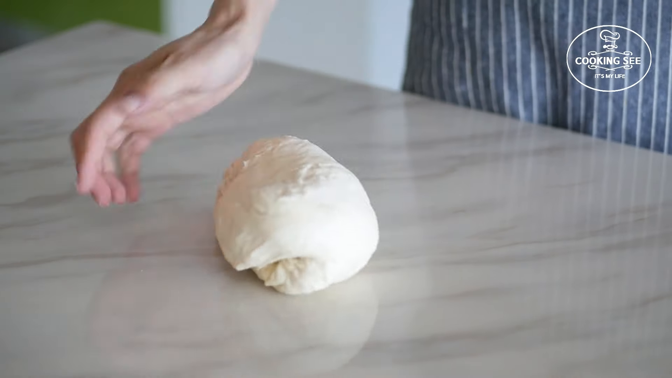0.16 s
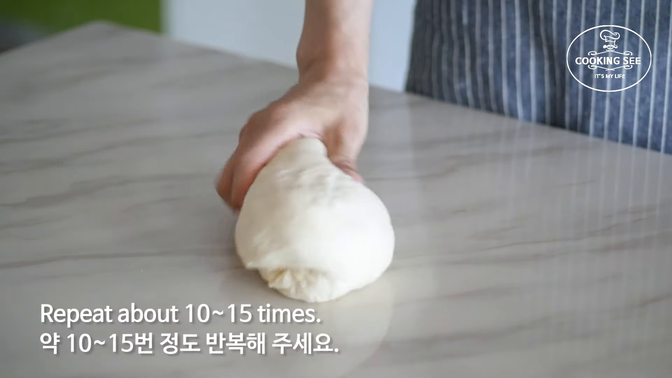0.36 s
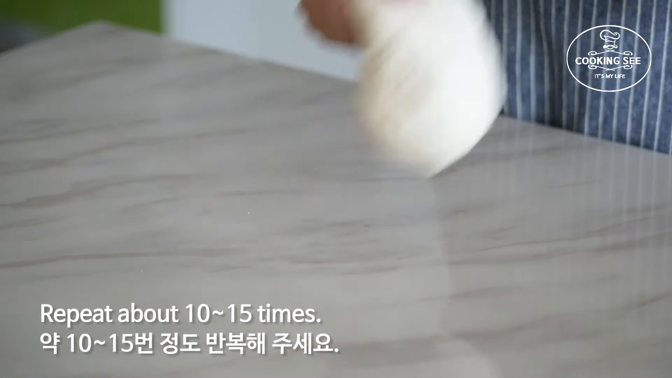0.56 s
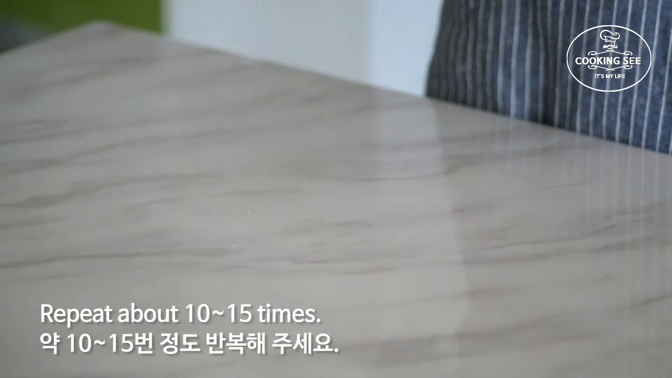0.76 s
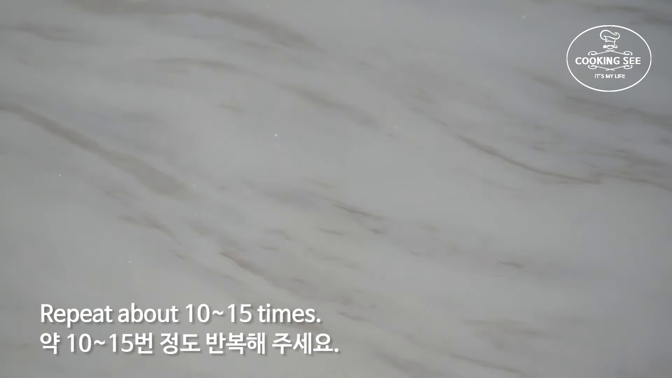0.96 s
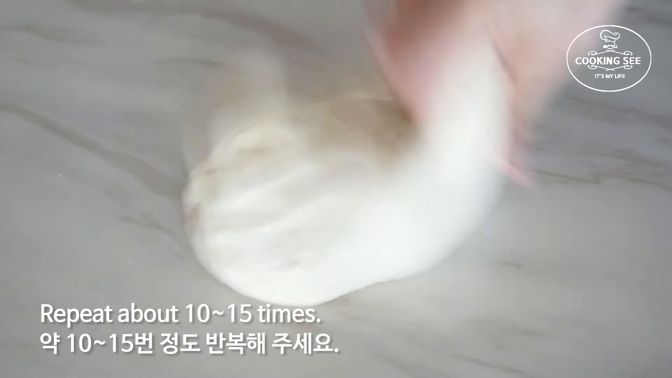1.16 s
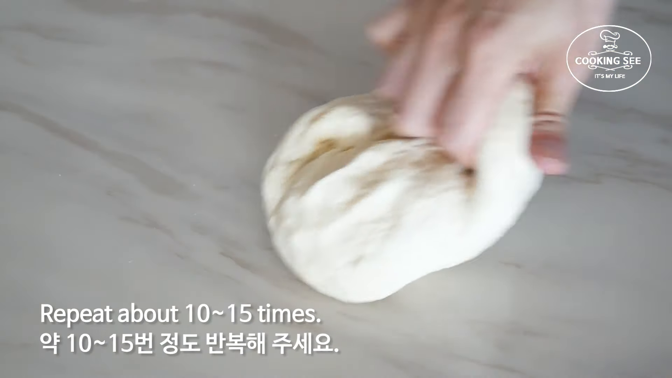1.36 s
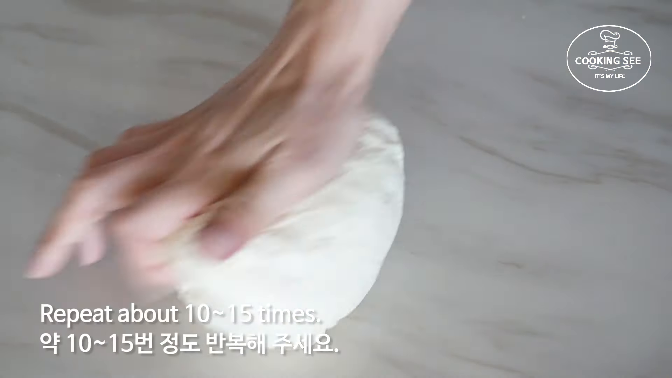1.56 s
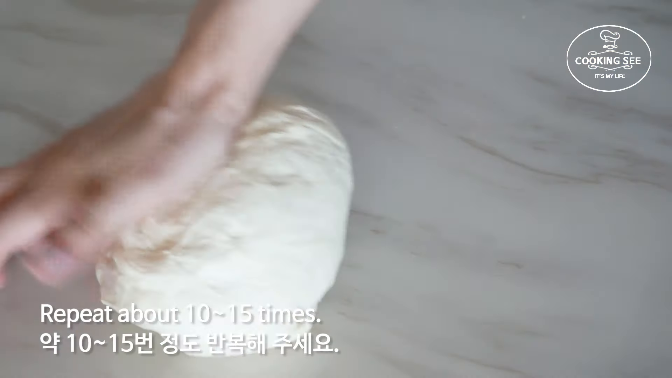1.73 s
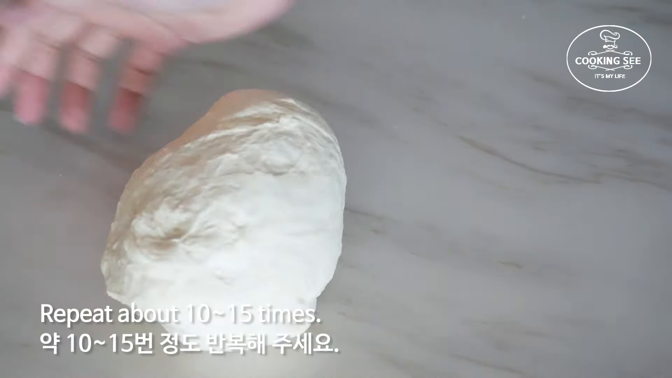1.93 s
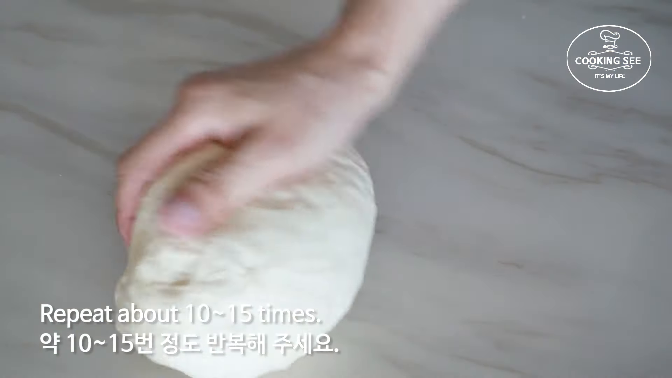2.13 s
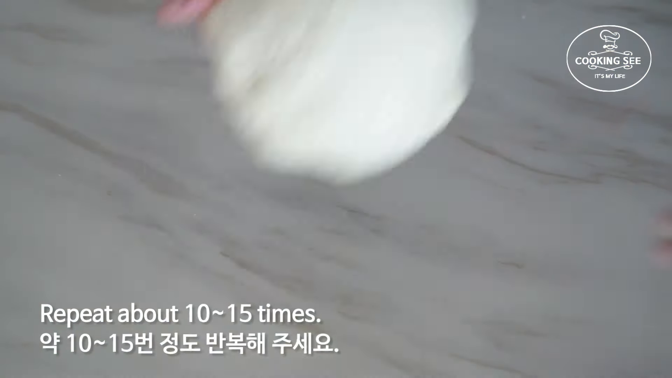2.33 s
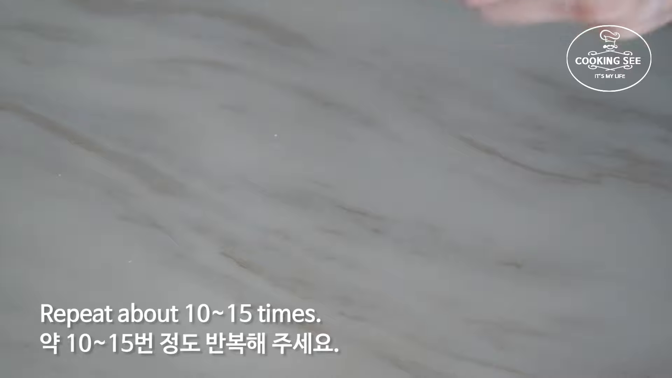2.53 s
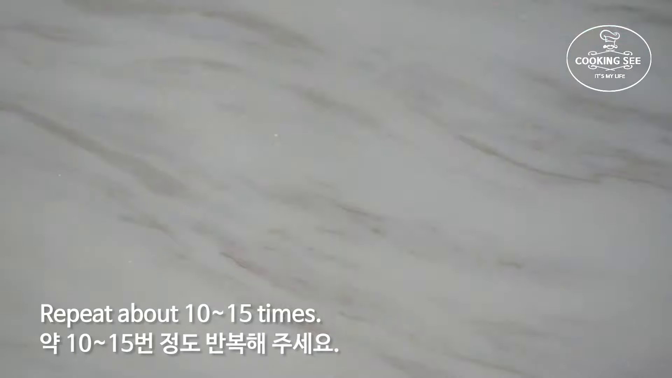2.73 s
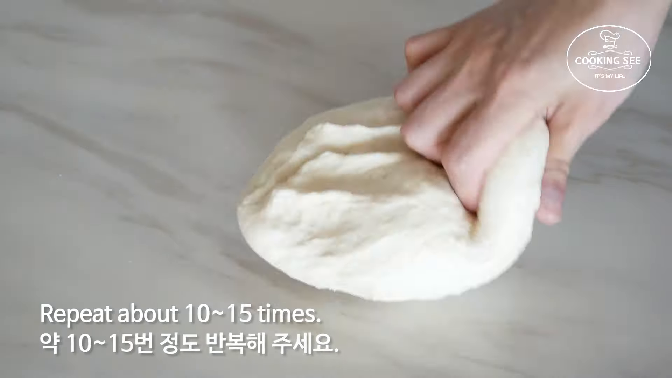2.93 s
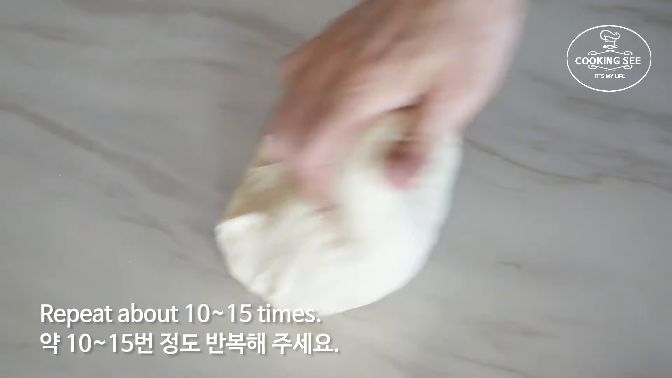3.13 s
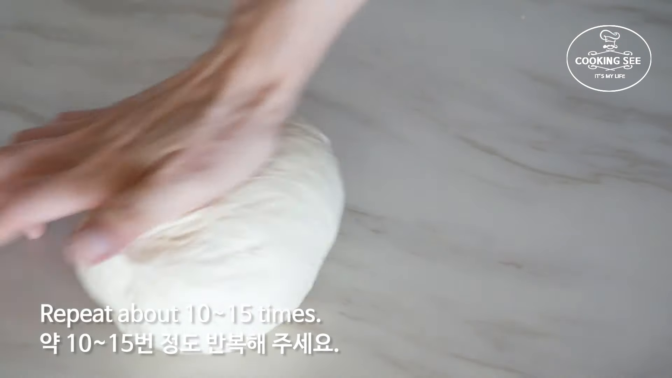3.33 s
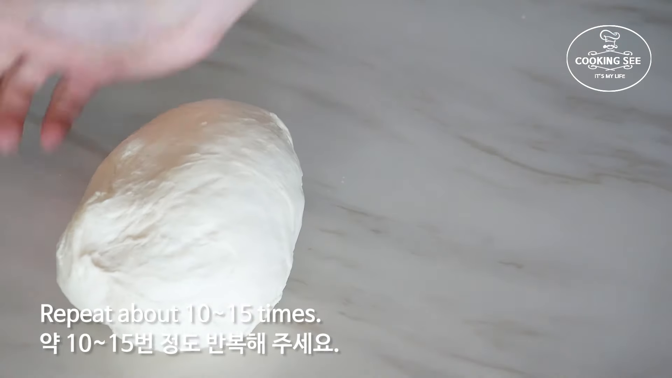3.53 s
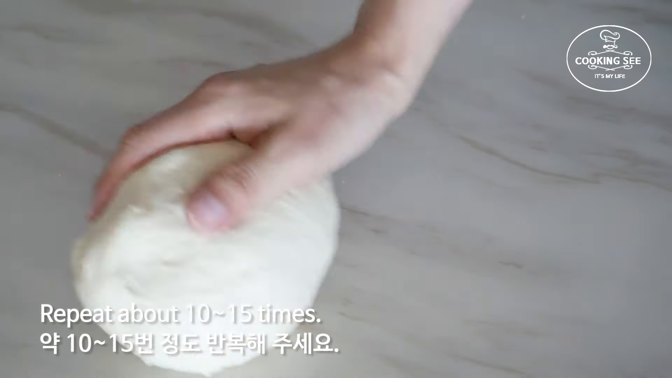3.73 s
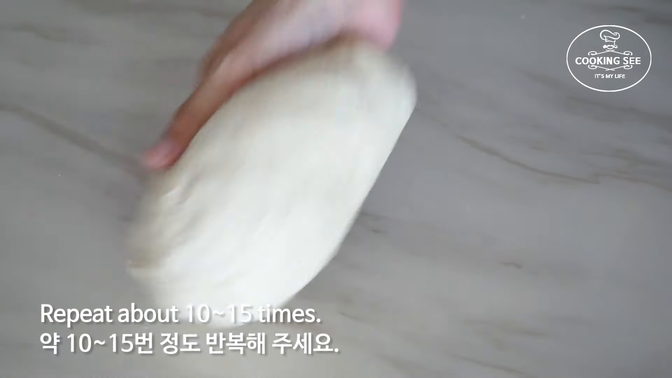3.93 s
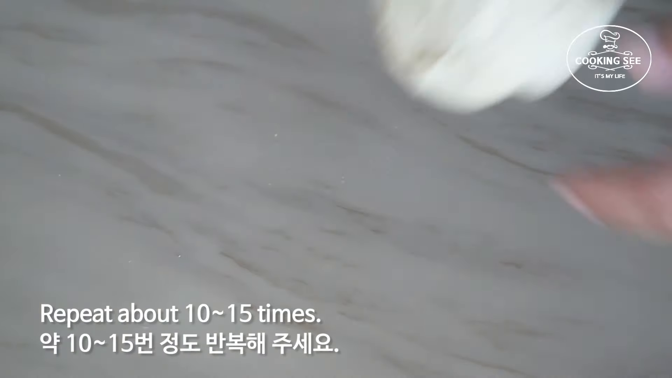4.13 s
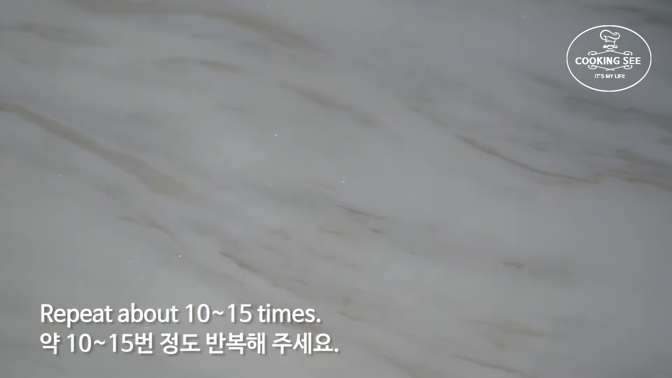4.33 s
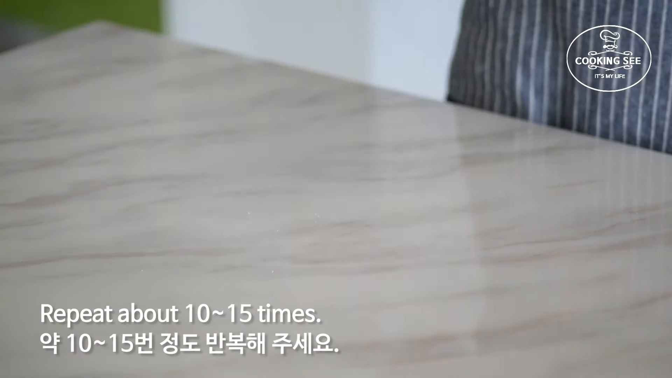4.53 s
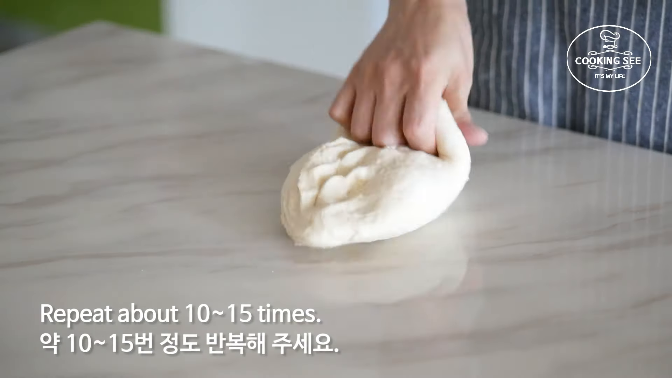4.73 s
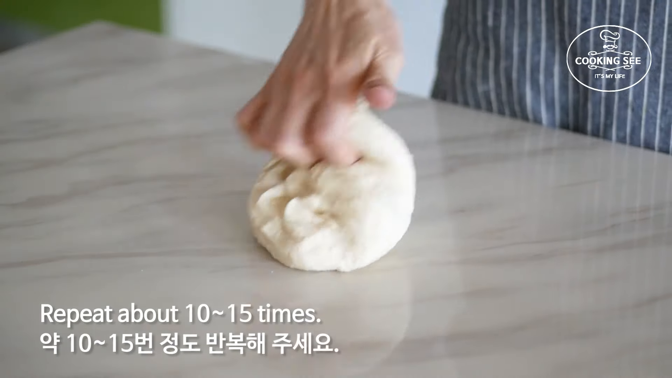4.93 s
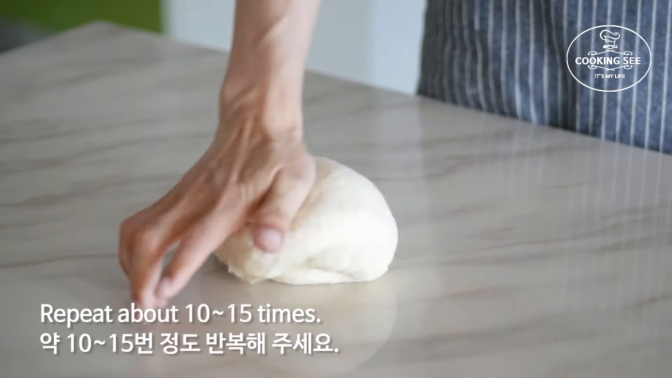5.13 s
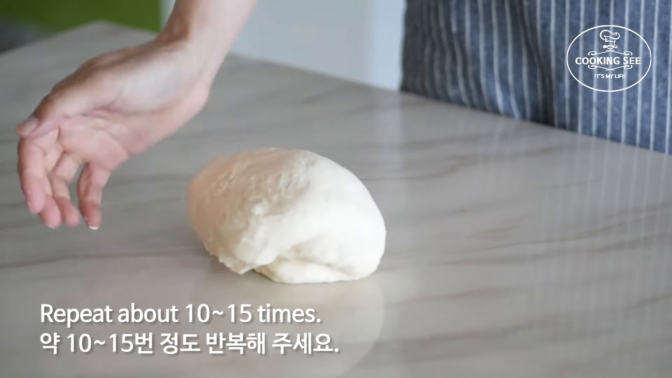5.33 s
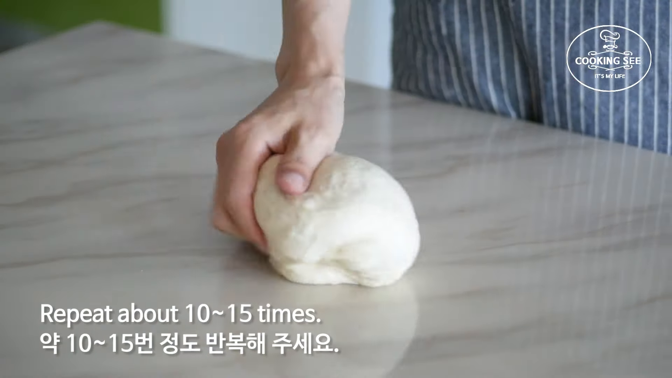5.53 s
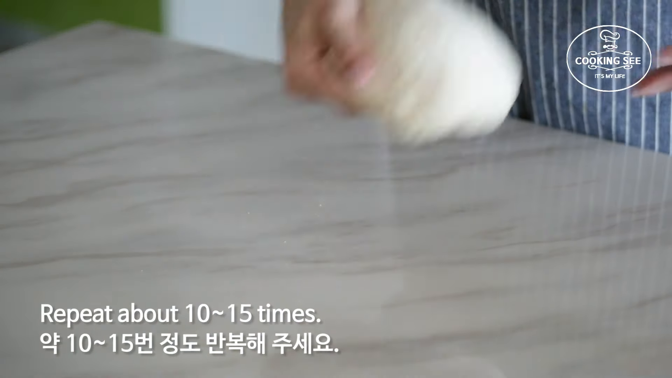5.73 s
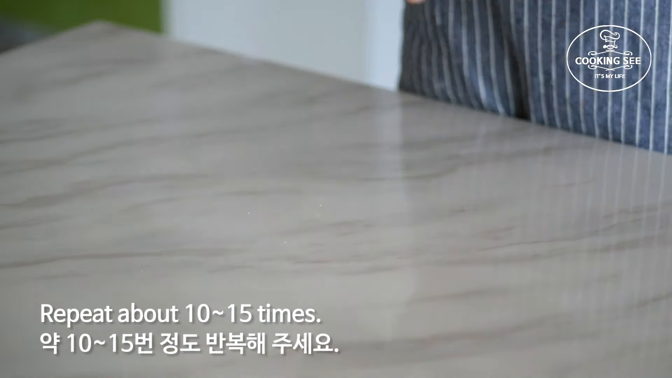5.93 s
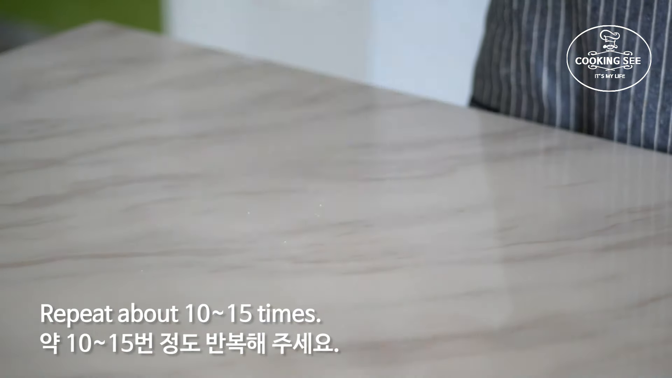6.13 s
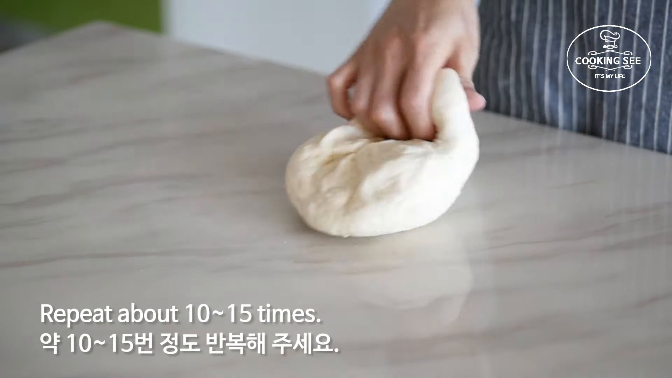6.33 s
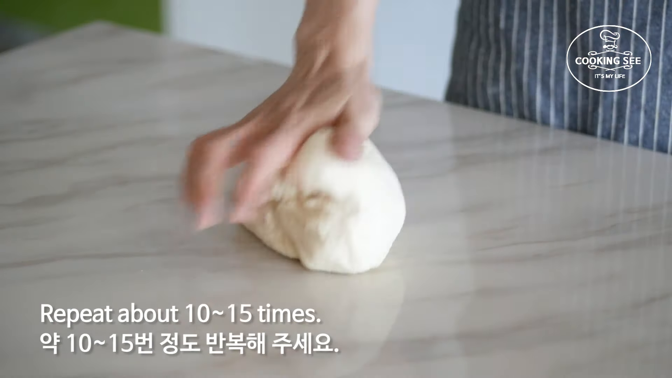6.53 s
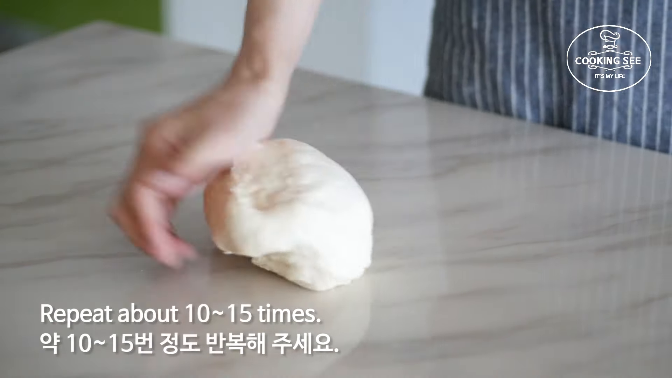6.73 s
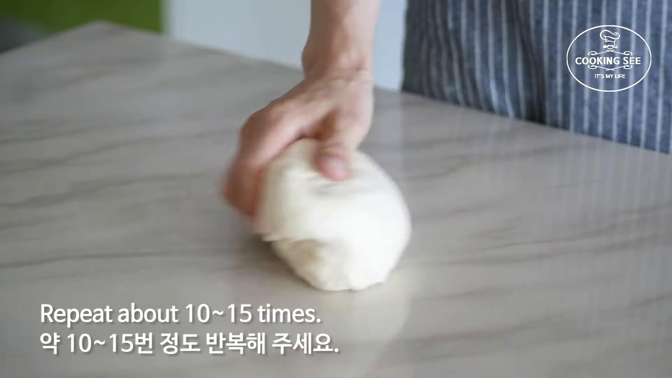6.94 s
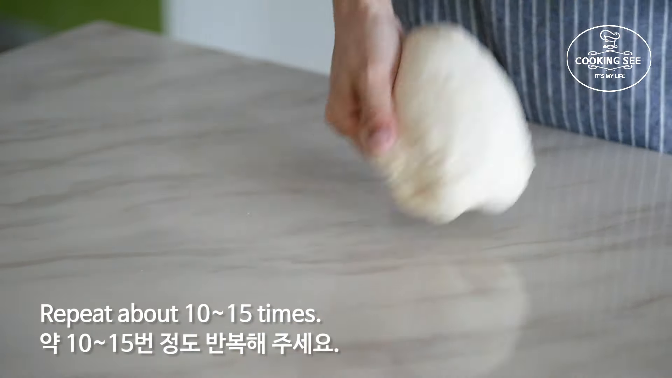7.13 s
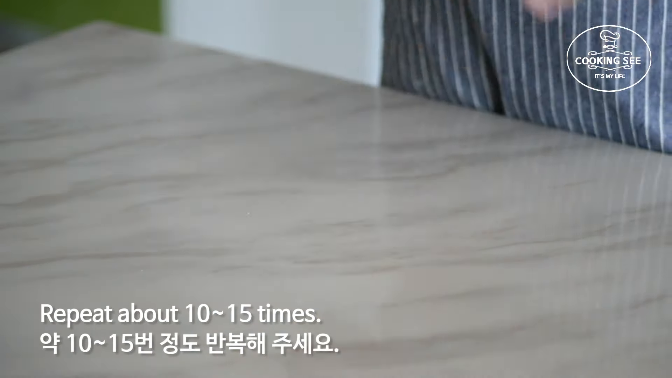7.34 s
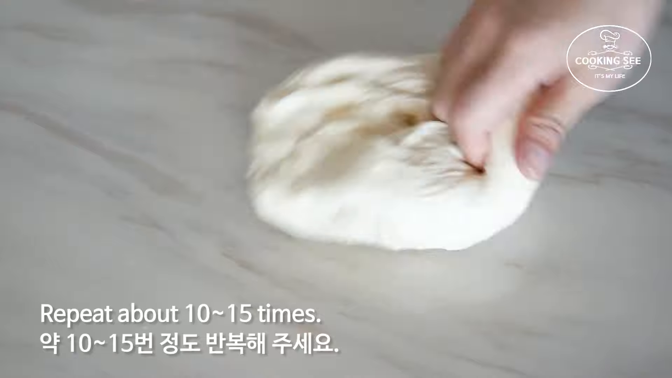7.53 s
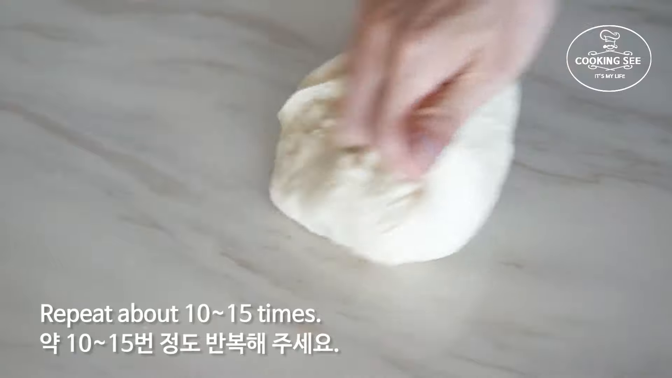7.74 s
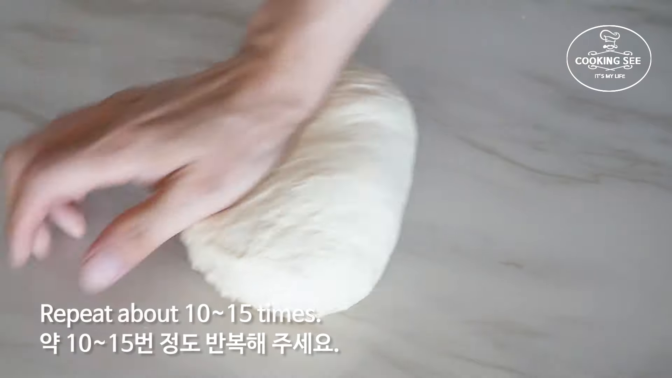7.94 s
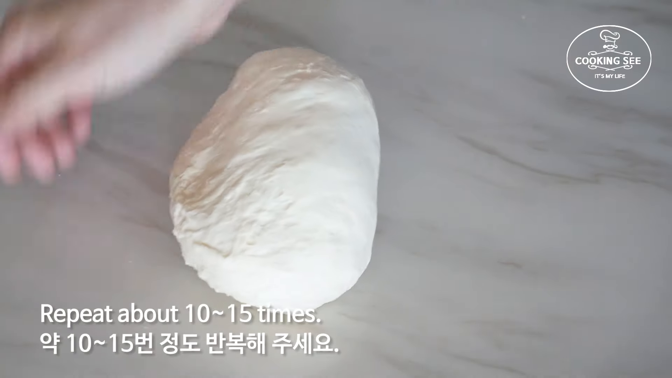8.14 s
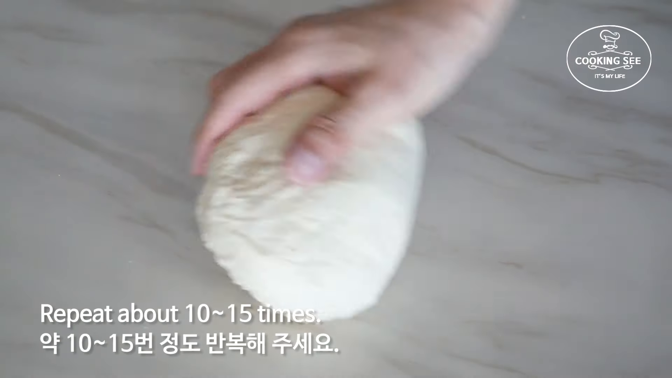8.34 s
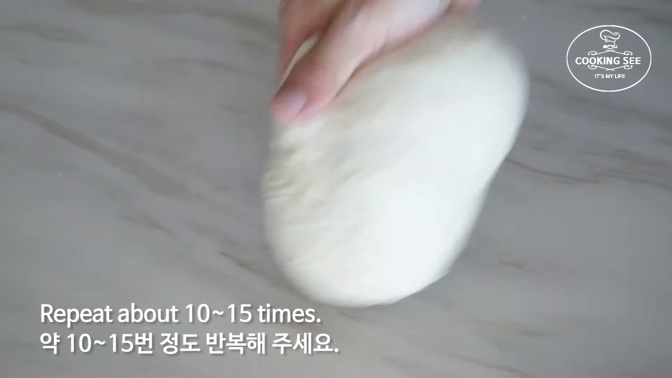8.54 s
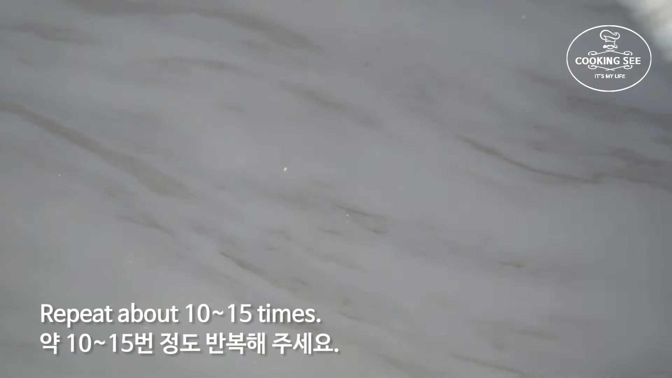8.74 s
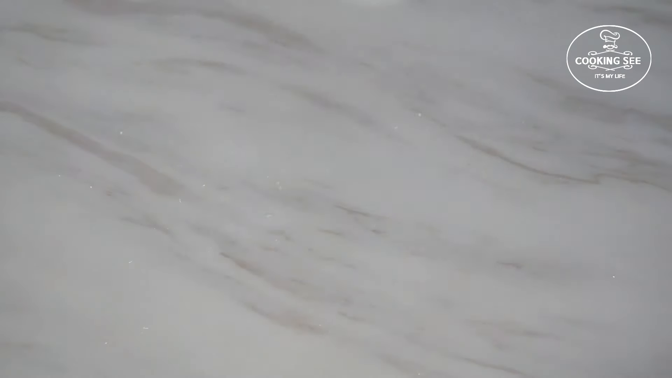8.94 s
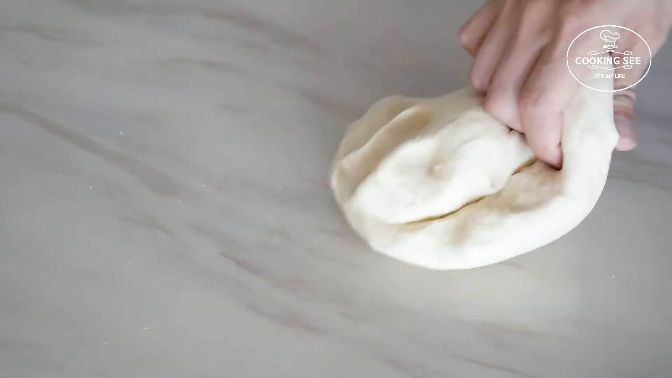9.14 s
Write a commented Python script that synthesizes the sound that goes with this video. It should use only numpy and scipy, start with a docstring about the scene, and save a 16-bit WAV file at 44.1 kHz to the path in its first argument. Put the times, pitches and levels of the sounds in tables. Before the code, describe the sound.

Bread dough is slapped on a stone counter six times, with soft folding and grabbing in between, in a quietly humming kitchen.

```python
"""A live home kitchen, stereo microphone close to a stone counter where bread dough is slapped six times.
Each slap is a low thump with a crackle of trapped air; the counter booms and some metalware rings along.
Between slaps the hand folds the dough, grabs it and peels it off the stone, once with a squeak.
Hard walls ring around it all, a quiet appliance hums behind, and the recorder limits the loud slaps."""
import sys
import numpy as np
from scipy import signal
from scipy.fft import rfft, irfft
from scipy.io import wavfile
from scipy.ndimage import uniform_filter1d

SR = 44100
rng = np.random.default_rng(int(sys.argv[2]) if len(sys.argv) > 2 else 0)


def materialize(psi):
    """Save the field psi as 16-bit PCM at rate SR to the path in sys.argv[1].

    A 1-D psi becomes a single channel; in a 2-D psi each row is a channel.
    """
    bounded = np.clip(np.atleast_2d(psi).T, -1, 1)
    quanta = np.round(bounded * 32767).astype(np.int16)
    wavfile.write(sys.argv[1], SR, quanta)


N = 404838
T = np.arange(N) / SR
BLOW_T = T[:4096]  # time within one blow [s]
CLICK = signal.unit_impulse(len(BLOW_T))

# the hand grabs the dough and lifts it:
# (time [s], thud [dB], pat [dB], smack [dB], thumb lag behind the fingers [s], lift pressure [dB])
GRABS = [(.319, -36.5, -22, -16.5, -0.023, -54), (2.094, -41, -18.5, -17, -0.02, -51),
         (3.761, -36, -10, -13.5, -0.031, -56.5), (5.503, -34, -12.5, -9.5, .013, -54),
         (6.938, -39, -21, -11.5, -0.0077, -56.5), (8.371, -37, -17.5, -18.5, -0.027, -55)]


def undb(db):
    """Decibels to gain."""
    return 10 ** (np.asarray(db) / 20)


def unit(x):
    """Scale to unit energy."""
    return x / np.sqrt(np.sum(x ** 2))


def along(points, hz):
    """Read (frequency [Hz], value) points on a log-frequency axis."""
    f, value = np.transpose(points)
    return np.interp(np.log(np.maximum(hz, 1)), np.log(f), value)


def colour(x, points, size=4096):
    """Minimum-phase filter through (frequency [Hz], level [dB]) points."""
    cepstrum = irfft(np.log(undb(along(points, np.fft.rfftfreq(size, 1 / SR)))))
    cepstrum[1:size // 2] *= 2
    cepstrum[size // 2 + 1:] = 0
    return signal.fftconvolve(x, irfft(np.exp(rfft(cepstrum))))[:len(x)]


def boost(x, hz, db, q=4.3):
    """Lift or cut the band around one resonance."""
    return x + (undb(db) - 1) * signal.lfilter(*signal.iirpeak(hz, q, fs=SR), x)


def add(track, s, x):
    """Mix x into the track from time s on."""
    start = int(s * SR)
    track[..., start:start + x.shape[-1]] += x[..., :N - start]


def pan(x, db):
    """Place a sound by its left minus right level."""
    return undb(np.array([[db], [-db]]) / 2) * x


def ring(modes):
    """Fading sines of a struck body."""
    t = T[:2 * SR]
    return sum(undb(db) * np.sin(2 * np.pi * hz * t) * undb(-60 * t / t60) for hz, db, t60 in modes)


def contact(rise_s):
    """The force of a soft contact swells to 1 and dies away."""
    return BLOW_T / rise_s * np.exp(1 - BLOW_T / rise_s)


def thump(hz, rise_s, glide):
    """A few low cycles that swell and sink towards hz as the dough spreads."""
    pitch = hz * (1 + glide * np.exp(-BLOW_T / rise_s))
    return contact(rise_s) ** 2 * np.sin(2 * np.pi * np.cumsum(pitch) / SR)


def grains(count, spread_db, hold=16):
    """Tiny pops of unequal size, each hold samples long."""
    sizes = undb(spread_db * rng.standard_normal(count // hold + 1))
    return np.repeat(sizes, hold)[:count] * rng.standard_normal(count)


def appliance(fan_db=-52):
    """In the background: soft fan noise, different in each channel, and wavering motor tones."""
    # fan air spectrum: (frequency [Hz], level [dB])
    fan_shape = [(25, -27.5), (70, -13.5), (150, -8.5), (215, 0), (260, -5.5), (450, -9.5), (700, -13),
                 (1050, -16), (1300, -21.5), (2000, -25), (5000, -31), (11000, -33.5), (15500, -42)]
    # motor tones: (frequency [Hz], level [dB])
    tones = [(220.7, -69.5), (479, -73), (620, -62), (834, -75.5)]
    channels = []
    for _ in range(2):
        fan = undb(fan_db) * np.sqrt(N) * unit(colour(rng.standard_normal(N), fan_shape))
        drifts = .02 * np.cumsum(rng.standard_normal((len(tones), N)), axis=1)
        hum = sum(undb(db) * np.sin(2 * np.pi * hz * T + drift) for (hz, db), drift in zip(tones, drifts))
        channels.append(fan + hum)
    return np.array(channels)


def kitchen(x, side_db=-9, echo_s=.0165, echo_db=-13, gap_s=.002, build_s=.001):
    """Hard walls around the microphone: one clear early echo and a short, dense tail."""
    # decay of the room: (frequency [Hz], T60 [s])
    decay = [(100, 0.38), (260, 0.45), (700, 0.5), (1840, 0.47), (4850, 0.44), (9000, 0.41), (15000, 0.4)]
    # tone of the reflections: (frequency [Hz], level [dB])
    walls = [(40, -30.5), (100, -26.5), (150, -9), (280, -9), (500, -8), (1200, -4), (3000, -2), (7000, 0),
             (15000, -6)]
    t = T[:SR]
    hz, s, cells = signal.stft(rng.standard_normal((2, SR)), SR, nperseg=256)
    t60 = along(decay, hz)[:, None]
    tails = signal.istft(cells * undb(-60 * s / t60) / np.sqrt(t60), SR)[1][:, :SR]
    onset = np.clip((t - gap_s) / build_s, 0, 1)
    mid, side = (colour(unit(tail * onset), walls) for tail in tails)
    mid += undb(echo_db) * colour(np.sinc((t - echo_s) * SR), walls)
    response = pan(mid, 1.1) + undb(side_db) * np.array([side, -side])
    return signal.fftconvolve(x[None], response, axes=1)[:, :N]


def rubs(lift_after_s=.2, lift_half_s=.034, swish_db=-31.5, swish_growth=.53):
    """Strokes and lifts: tacky dough crackles as it peels, dry skin swishes over the stone."""
    # the hand rubs dough and stone: (middle time [s], pressure [dB], half length [s])
    strokes = [(.131, -49.5, .014), (.823, -52, 0.0082), (.906, -52.5, 0.017), (1.674, -46.5, 0.0088),
               (1.85, -50.5, 0.022), (3.533, -49.5, 0.022), (4.02, -50, 0.025), (4.465, -56, 0.048),
               (5.07, -42.5, 0.03), (5.287, -47.5, 0.018), (6.021, -55.5, 0.044), (6.094, -52.5, .0096),
               (6.803, -54, .043), (8.145, -43.5, 0.0078), (8.494, -53.5, 0.014)]
    # peeling dough: (frequency [Hz], level [dB])
    tack_shape = [(100, -2), (250, 13), (700, 2), (1500, -1.5), (2800, -2), (5000, -6.5), (10000, -19)]
    # sliding skin: (frequency [Hz], level [dB])
    swish_shape = [(1500, -25.5), (5000, 2), (7000, 1), (11000, 2.5), (16000, -16)]
    tack_force, swish_force = np.zeros(N), np.zeros(N)
    lifts = [(s + lift_after_s, lift_db, lift_half_s) for s, *_, lift_db in GRABS]
    for s, pressure_db, half_s in strokes + lifts:
        swell = np.exp(-.5 * ((T[:SR // 5] - .1) / half_s) ** 2)
        add(tack_force, s - .1, undb(pressure_db) * swell)
        # the swish grows more slowly than the pressure: light strokes are dry, firm ones tacky
        add(swish_force, s - .1, undb(swish_db + swish_growth * pressure_db) * swell)
    tack = unit(colour(grains(N, spread_db=5), tack_shape))
    swish = unit(colour(grains(N, spread_db=2), swish_shape))
    return np.sqrt(N) * (tack_force * tack + swish_force * swish)


def squeak(s=4.0047, start_hz=4900, end_hz=3620, upper_hz=5200, db=-30):
    """Damp dough slips on the stone as it lifts: a rough falling squeak under a weaker, level one."""
    fall_s, length_s, fade_s = .016, .021, .035
    release = np.clip((length_s - BLOW_T) / .0048 + 1, 0, 1)
    envelope = np.clip(BLOW_T / .001, 0, 1) * release * np.exp(-BLOW_T / fade_s)
    waver = 1 + .25 * uniform_filter1d(rng.standard_normal((2, len(BLOW_T))), size=24)
    fall_hz = end_hz + (start_hz - end_hz) * np.clip(1 - BLOW_T / fall_s, 0, 1) ** 2
    low, high = 2 * np.pi * np.cumsum([fall_hz * waver[0], upper_hz * waver[1]], axis=1) / SR
    # the jerky slip couples the two tones and adds their overtones
    overtones = np.sin(2 * low) + np.sin(low + high) + np.sin(2 * high) + .5 * np.sin(2 * low + high)
    tone = np.sin(low) + undb(-4) * np.sin(high) + undb(-18) * overtones
    out = np.zeros(N)
    add(out, s, undb(db) * envelope * tone)
    return out


def hand_blows(fold_rise_s=.0037, grab_rise_s=.0032, thumb_rise_s=.006, catch_rise_s=.0044, thumb_db=-7):
    """Every fold, grab and catch as (time [s], thud [dB], pat [dB], smack [dB], rise [s])."""
    # the dough is folded over and pressed down: (time [s], pat [dB], thud [dB])
    folds = [(.044, -13, -45), (1.543, -15, -36), (1.753, -13, -48), (3.379, -15.5, -42),
             (3.414, -17.5, -40.5), (5.157, -9, -34.5), (6.589, -16.5, -36), (8.035, -17, -41.5),
             (8.061, -15.5, -34)]
    # fingers catch the dough in the air: (time [s], smack [dB], thud [dB])
    catches = [(.786, -18.5, -51), (2.544, -18, -48.5), (2.565, -21.5, -35.5), (5.893, -19, -42),
               (7.427, -24.5, -64)]
    for s, pat_db, thud_db in folds:
        yield s, thud_db, pat_db, pat_db - 11, fold_rise_s  # a fold is hardly sticky: little smack
    for s, thud_db, pat_db, smack_db, thumb_lag_s, _ in GRABS:
        yield s, thud_db, pat_db, smack_db, grab_rise_s
        yield s + thumb_lag_s, thud_db + thumb_db, pat_db + thumb_db, smack_db + thumb_db, thumb_rise_s
    for s, smack_db, thud_db in catches:
        yield s, thud_db, smack_db - 3.5, smack_db, catch_rise_s


def touches(thud_hz=225, squash_rise_s=.015, squash_over_thud_db=23.5):
    """The hand lands on soft dough with a thud, squash, pat and smack; returns close sound, room feed."""
    # dough giving way: (frequency [Hz], level [dB])
    squash = [(60, -22), (150, 4.5), (330, -1), (550, -11.5), (1500, -35)]
    # hollow pat of the palm: (frequency [Hz], level [dB])
    pat = [(150, -18.5), (450, 4.5), (800, 1), (1400, -9), (3000, -25.5), (12000, -29.5)]
    # sticky smack: (frequency [Hz], level [dB])
    smack = [(300, -3.5), (1200, 0.5), (2700, 1.5), (4500, -5), (10000, -9.5), (15000, -23)]
    close, to_room = np.zeros(N), np.zeros(N)
    for s, thud_db, pat_db, smack_db, rise_s in hand_blows():
        hz = thud_hz * np.exp(.12 * rng.standard_normal())
        thud = undb(thud_db) * thump(hz, 2.56 * rise_s, glide=.37)
        add(close, s, thud)
        add(to_room, s, thud)
        # the palm lands quickly, then keeps pressing air out of the fold
        pressing = np.sqrt(contact(rise_s)) + .35 * contact(9.7 * rise_s)
        layers = [(contact(squash_rise_s), squash, thud_db + squash_over_thud_db, 1.5),
                  (pressing, pat, pat_db, 3),
                  (contact(.83 * rise_s), smack, smack_db, 5.5)]
        for force, shape, db, spread_db in layers:
            add(close, s, undb(db) * unit(colour(force * grains(len(BLOW_T), spread_db), shape)))
            add(to_room, s + rise_s, undb(db) * unit(colour(CLICK, shape)))
    return close, to_room


def counter(shake, gain_db=-13):
    """Each slap sets the counter and the cabinet under it booming."""
    # counter and cabinet modes: (frequency [Hz], level [dB], T60 [s])
    modes = [(86, -19.5, 0.58), (147.5, 0, 0.473), (229.3, -5.5, 0.71), (285, -7.5, 0.79), (380, -7, 0.13),
             (591, -12, 0.4), (739, 2.5, 0.31)]
    return undb(gain_db) * signal.fftconvolve(shake, ring(modes))[:N]


def air_crack(pops, gain_db, hollow_hz, squelch_hz, squelch_db):
    """Air squeezed from under the dough bursts out and rings the folds that it escapes through."""
    # bursting air: (frequency [Hz], level [dB])
    shape = [(60, -22.5), (200, -3), (450, 4.5), (900, -0.5), (1400, -3), (2100, -4.5), (3300, -6.5),
             (5200, -10), (10000, -10), (13000, -17.5), (16000, -28.5)]
    burst = colour(unit(pops), shape)
    softened = colour(burst, [(3200, .0049), (7000, -2)])
    hollow = boost(softened, hollow_hz, db=6, q=3)
    squelch = boost(hollow, squelch_hz, squelch_db)
    # the folds swallow a band just above the squelch
    return undb(gain_db) * boost(squelch, 1.655 * squelch_hz, -.55 * squelch_db, q=5.1)


def slaps(thump_db=10.5, crack_db=37, width_db=-14, room_db=-1, settle_s=.004):
    """Dough thumps on the stone and traps air; returns close sound, room feed and counter shake."""
    # each landing: (time [s], force [dB], trapped air [dB], thump [Hz], hollow [Hz], squelch [Hz],
    # squelch lift [dB], metalware [dB], left minus right [dB])
    landings = [(1.2487, 0.5, -2.5, 254.6, 685, 4640, 1.5, -54, 2),
                (2.9575, -4.5, -0.96, 308, 930, 2550, 6.5, -53, -0.5),
                (4.746, -1.1, 3, 225, 730, 2180, 3.5, -21, 1.5),
                (6.2605, -0.5, 0.6, 215, 2420, 4100, 4.5, -60, 3.5),
                (7.5828, -2, 0.7, 233, 410, 3060, 1.5, -27.5, -1),
                (9.1642, -24, 3, 192, 870, 1900, 2.5, -44, 5.5)]
    # metalware modes: (frequency [Hz], level [dB], T60 [s])
    metalware = [(772, -5, 0.96), (1206, -18, .8), (1424, -12, 1.34), (1457, -15, 0.97)]
    close, to_room, shake = np.zeros((2, N)), np.zeros(N), np.zeros(N)
    for s, force_db, air_db, hz, hollow_hz, squelch_hz, squelch_db, metal_db, pan_db in landings:
        thump_rise_s, crack_rise_s = .83 / hz, .41 / hz  # a lower slap is also a slower one
        voicing = (crack_db + force_db + air_db, hollow_hz, squelch_hz, squelch_db)
        # the front edge lands at once; the rest follows within a few milliseconds
        force = contact(crack_rise_s) + .38 * np.exp(-BLOW_T / settle_s)
        mid, side = (air_crack(force * grains(len(BLOW_T), spread_db=8), *voicing) for _ in range(2))
        wobble = thump(hz, thump_rise_s, glide=.28) + undb(-10) * thump(2 * hz, thump_rise_s, glide=.32)
        # trapped air cushions the thump as much as it feeds the crack
        low = undb(thump_db + force_db - air_db) * wobble
        add(close, s, pan(low + mid, pan_db) + undb(width_db) * np.array([side, -side]))
        add(close, s, pan(undb(metal_db) * ring(metalware), 0))
        # the walls get the burst from all directions, so its pops merge into one smooth crack
        add(to_room, s + crack_rise_s, undb(room_db) * air_crack(CLICK, *voicing))
        add(to_room, s, undb(room_db) * low)
        add(shake, s + thump_rise_s, undb([force_db]))
    return close, to_room, shake


def scene():
    """Hard slaps and soft handling close to the microphone, with the kitchen behind them."""
    dough, dough_to_room, shake = slaps()
    hand, hand_to_room = touches()
    strokes, slip = rubs(), squeak()
    room = kitchen(dough_to_room + undb(-1.65) * hand_to_room + undb(-4) * strokes + undb(-7) * slip)
    return dough + pan(hand + strokes + slip, 1) + pan(counter(shake), .8) + room + appliance()


def limiter(x, threshold_db=-7, attack_s=.0042, release_db_per_s=45):
    """The gain dives at a loud slap and creeps back, which draws out the ring of the room."""
    power = uniform_filter1d(np.mean(x ** 2, axis=0), int(attack_s * SR))
    over_db = 20 * np.log10(np.maximum(np.sqrt(np.abs(power)) / undb(threshold_db), 1))
    held_db = np.maximum.accumulate(over_db + release_db_per_s * T) - release_db_per_s * T
    return x * undb(-held_db)


def record(dry, low_cut_hz=55, top_hz=15400, ceiling=.98):
    """The recorder limits the slaps, rounds off their peaks and cuts rumble and top."""
    # the slightly duller left microphone port: (frequency [Hz], level [dB])
    left_port = [(500, 1.5), (5000, 0), (12000, -1.5)]
    limited = limiter(np.array([colour(dry[0], left_port), dry[1]]))
    trimmed = signal.lfilter(*signal.butter(1, low_cut_hz, "high", fs=SR), limited)
    rounded = trimmed / (1 + (trimmed / ceiling) ** 6) ** (1 / 6)
    return signal.sosfilt(signal.ellip(8, .2, 70, top_hz, fs=SR, output="sos"), rounded)


dry = scene()
out = record(dry)
materialize(out)
```